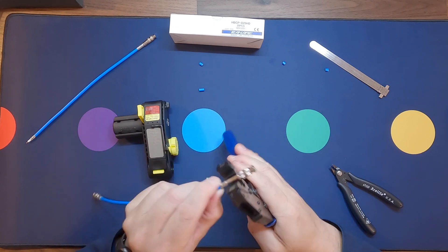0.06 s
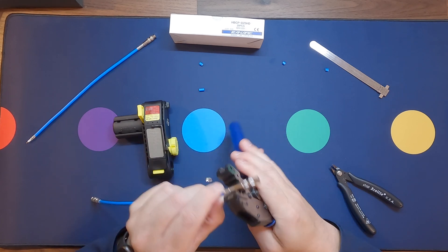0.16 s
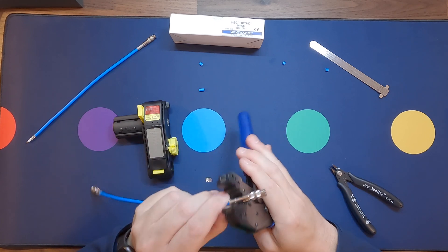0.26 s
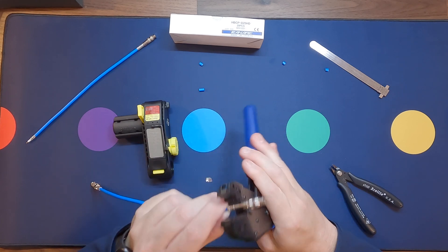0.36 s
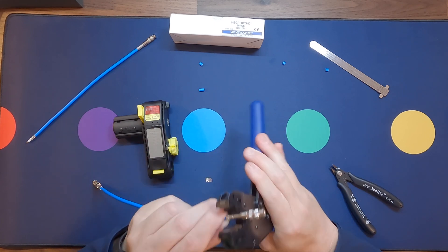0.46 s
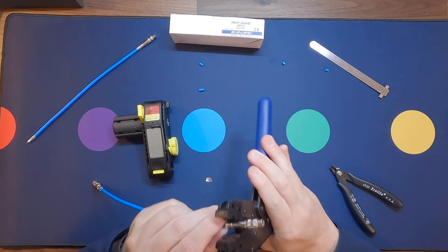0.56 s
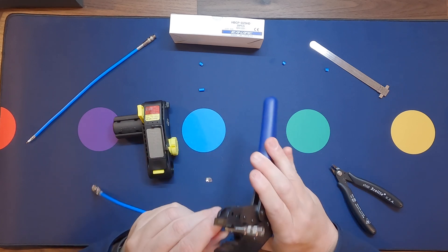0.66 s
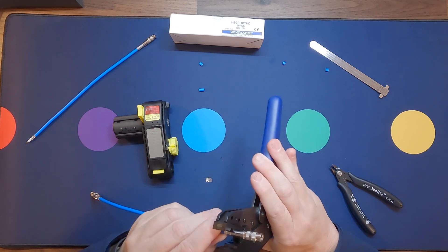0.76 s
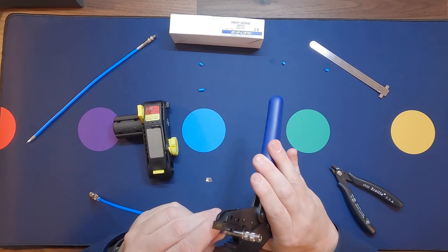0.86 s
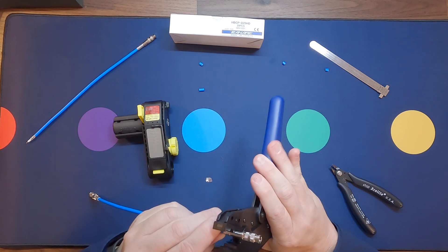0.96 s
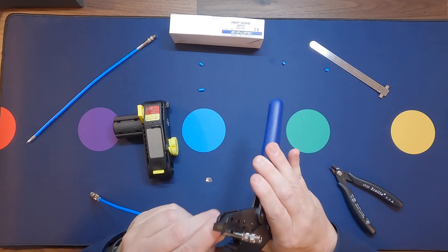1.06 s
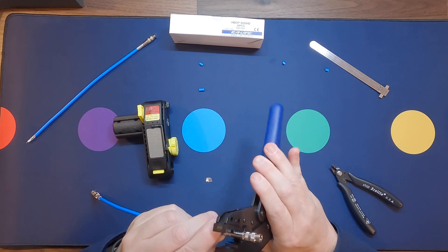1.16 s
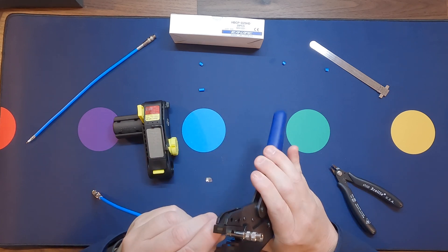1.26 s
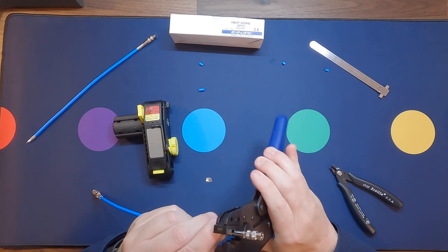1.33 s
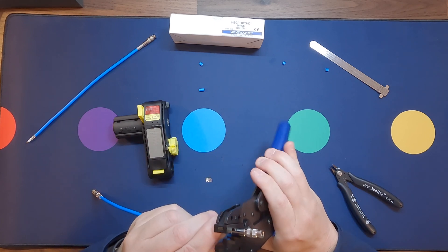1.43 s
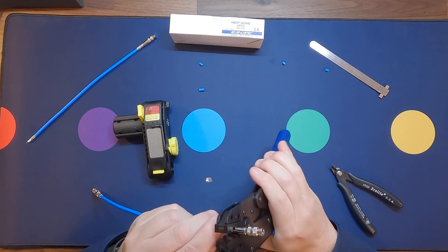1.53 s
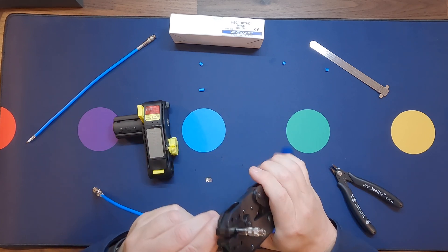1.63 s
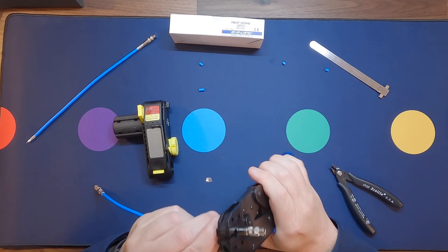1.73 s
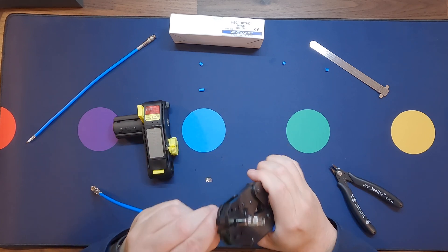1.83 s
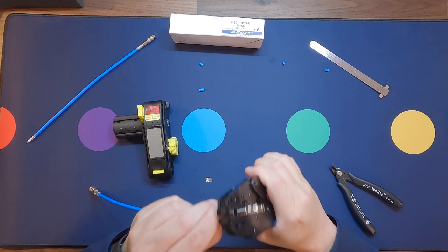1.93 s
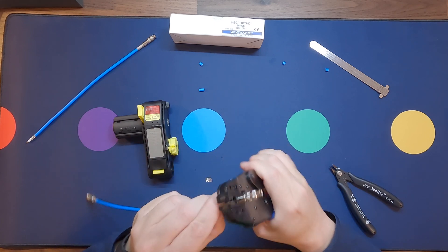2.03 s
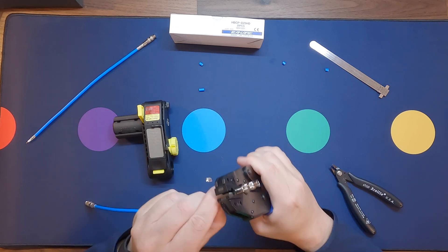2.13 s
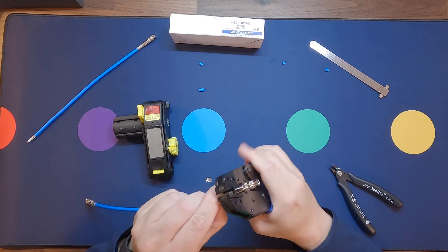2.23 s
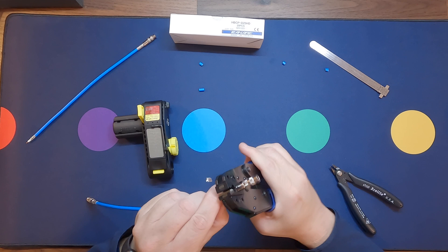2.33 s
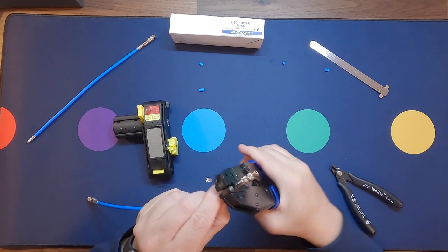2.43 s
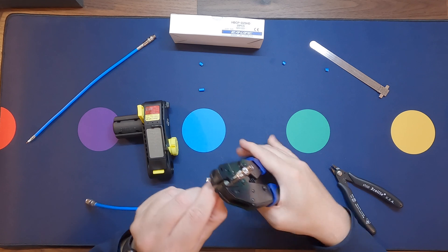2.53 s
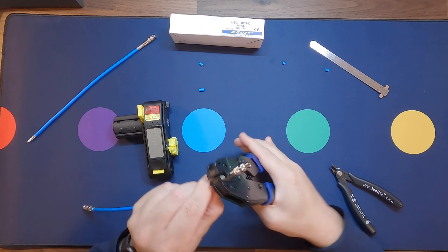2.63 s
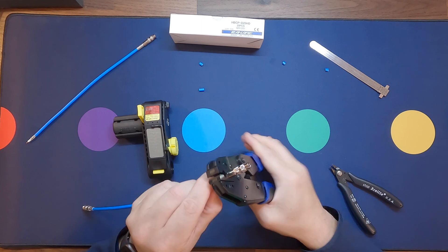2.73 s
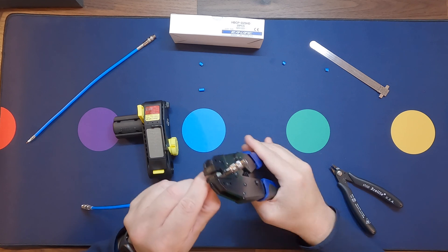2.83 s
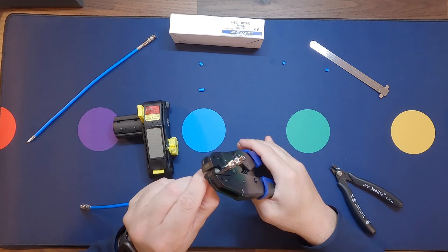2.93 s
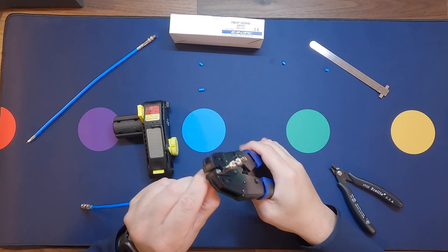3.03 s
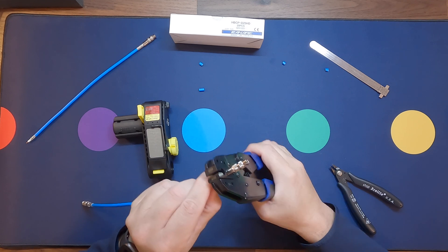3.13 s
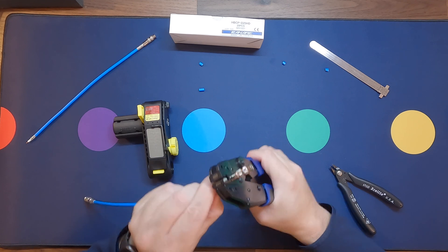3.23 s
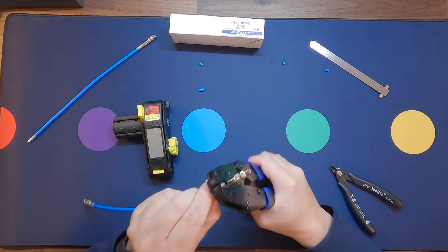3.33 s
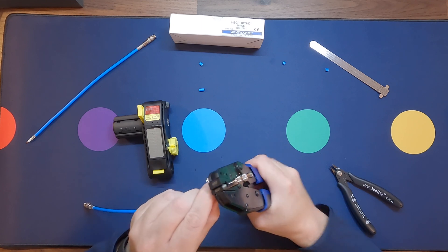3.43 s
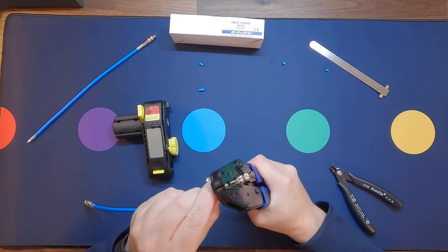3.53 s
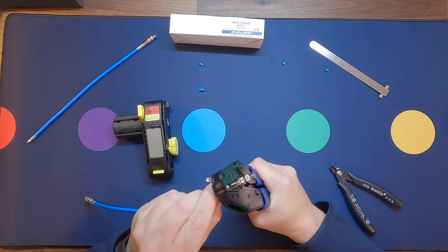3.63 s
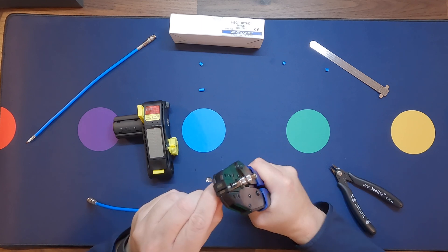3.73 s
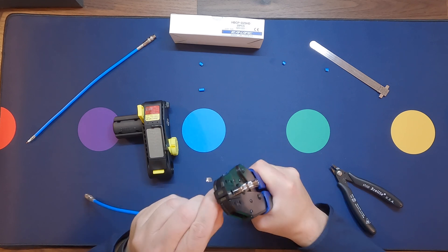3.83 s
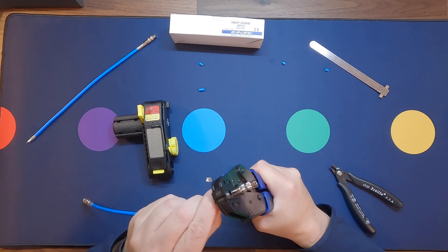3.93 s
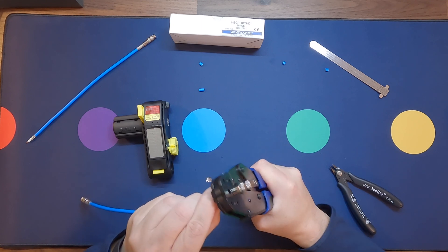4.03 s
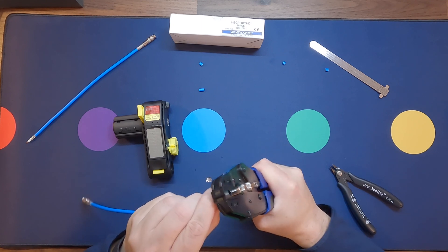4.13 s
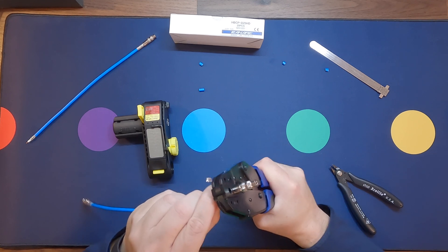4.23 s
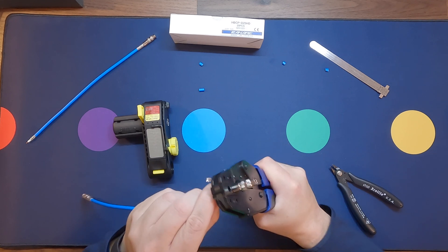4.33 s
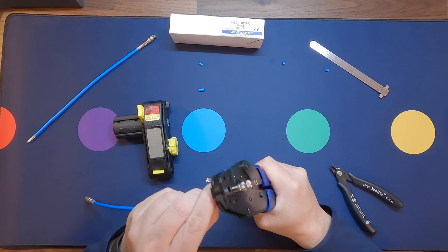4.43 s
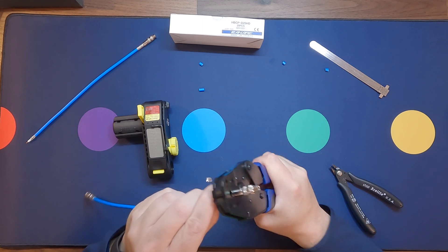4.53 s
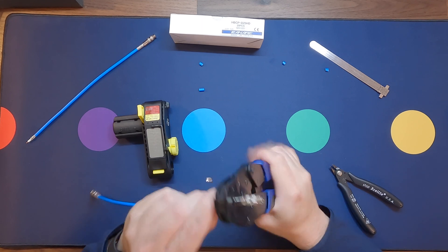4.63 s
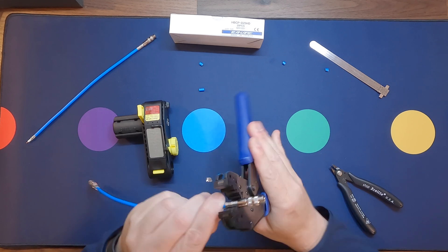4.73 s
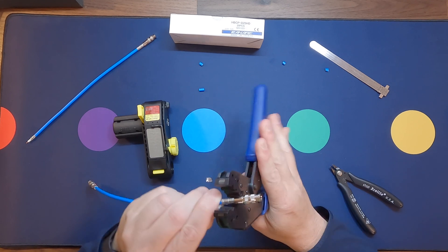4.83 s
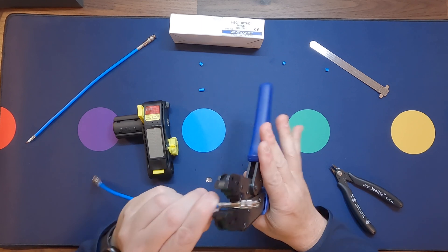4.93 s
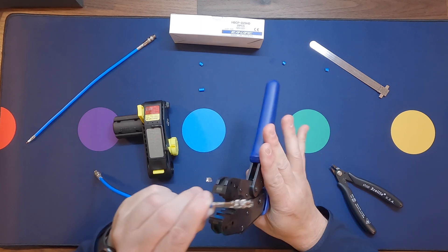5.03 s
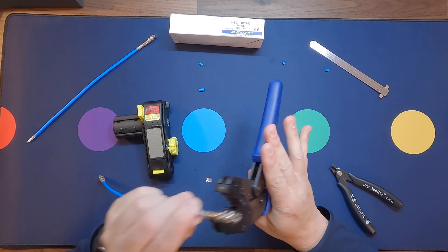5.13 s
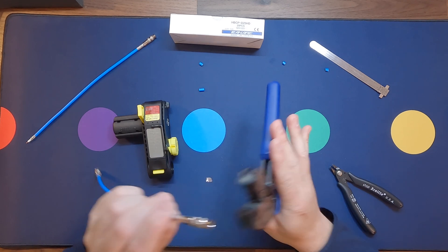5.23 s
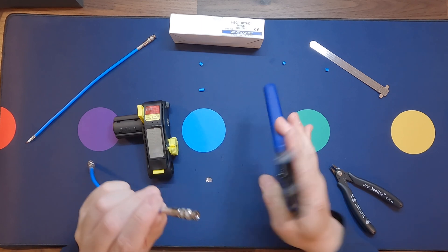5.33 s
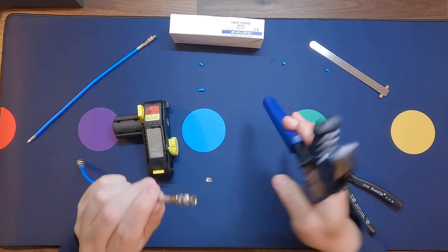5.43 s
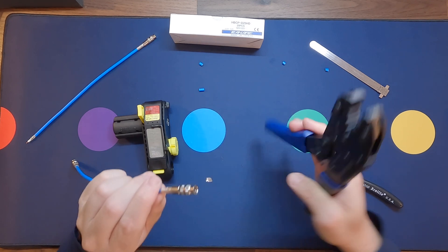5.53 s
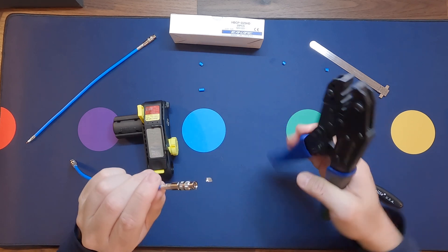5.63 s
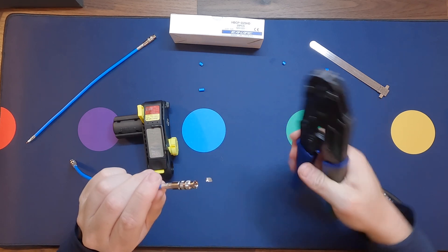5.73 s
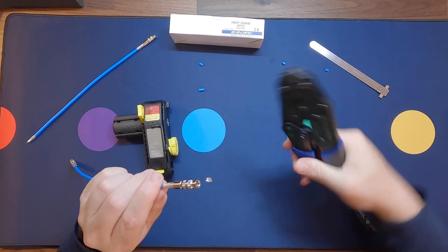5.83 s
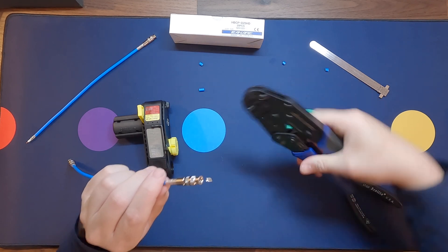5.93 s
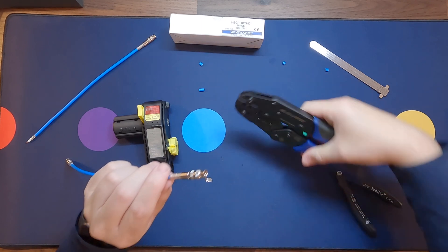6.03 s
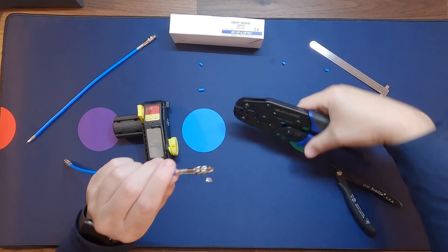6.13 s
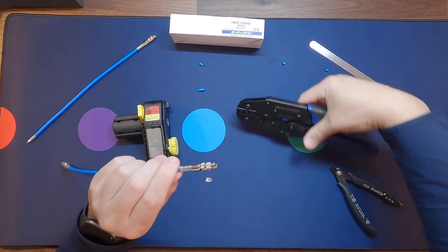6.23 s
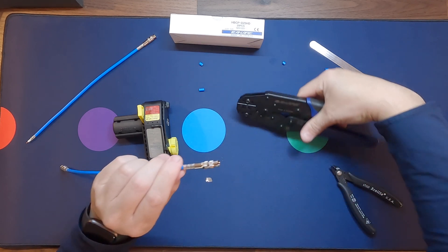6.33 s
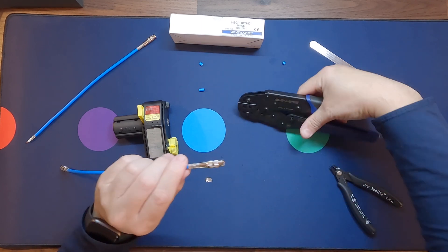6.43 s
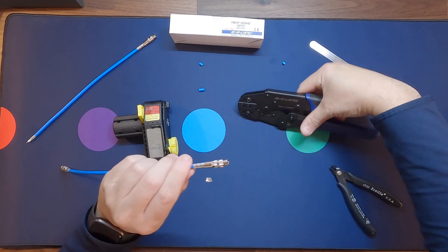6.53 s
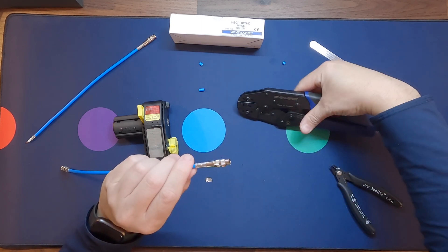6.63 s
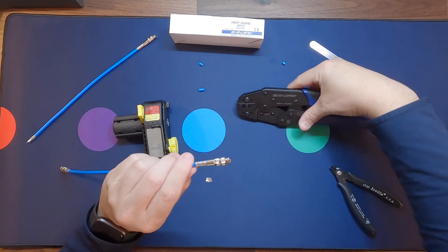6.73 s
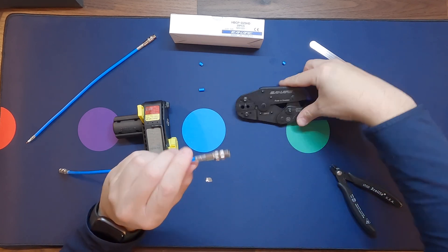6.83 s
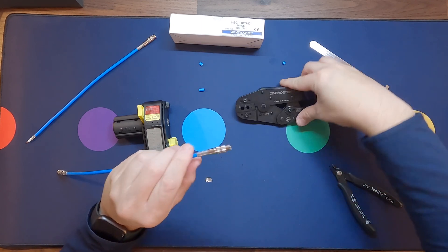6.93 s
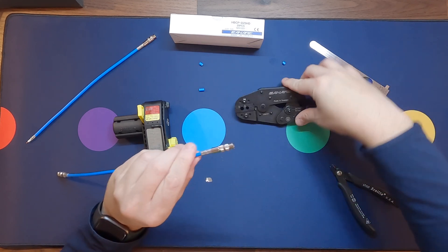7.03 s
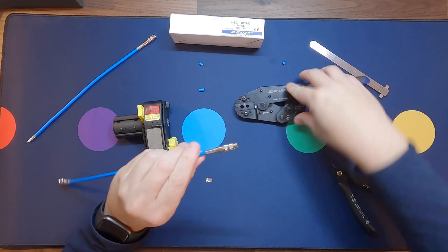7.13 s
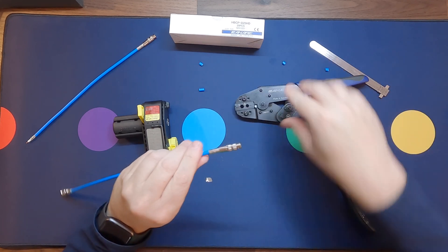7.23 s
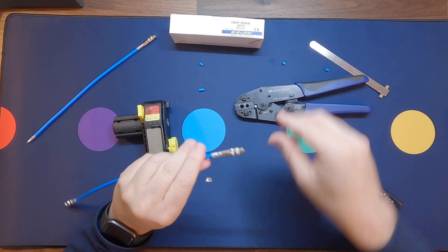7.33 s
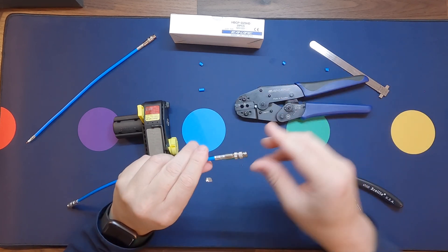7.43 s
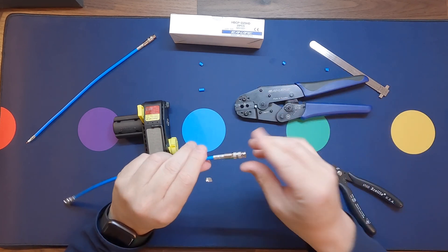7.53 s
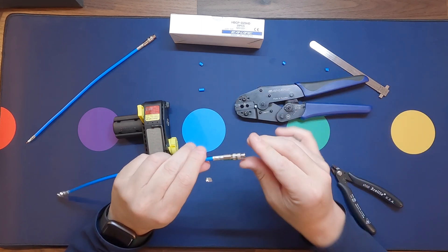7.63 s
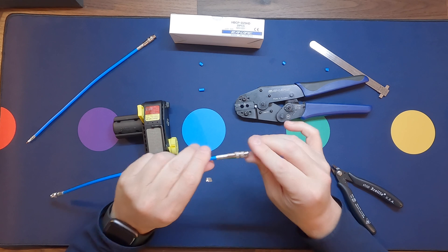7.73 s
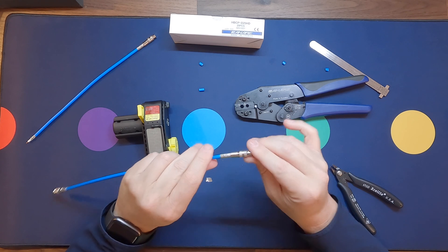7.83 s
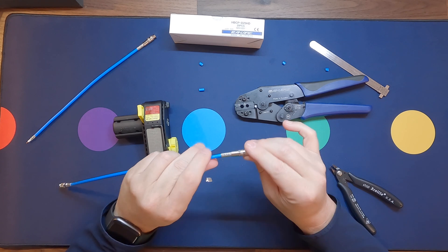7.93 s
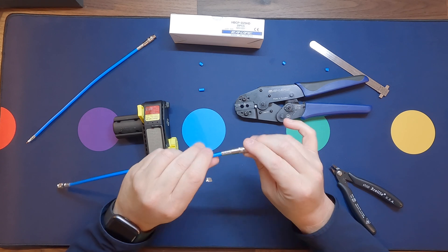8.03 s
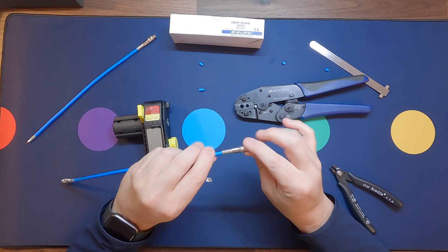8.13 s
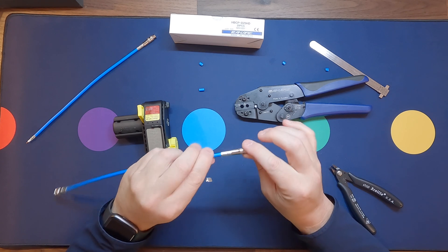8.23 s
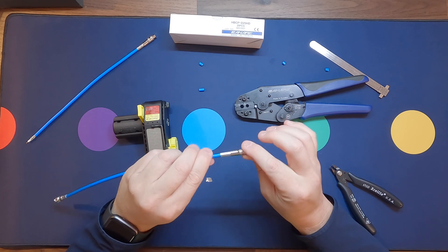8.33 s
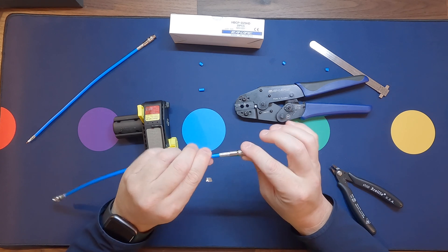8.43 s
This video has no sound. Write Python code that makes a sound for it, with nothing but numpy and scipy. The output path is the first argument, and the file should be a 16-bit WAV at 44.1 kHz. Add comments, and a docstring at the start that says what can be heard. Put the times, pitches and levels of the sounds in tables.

```python
"""A steel ratchet crimper is handled close under a camera in a small room. First come light clicks,
rubbing hands and the low sway of the camera arm; then an engine starts to drone through the wall.
Squeezes near 1.7 s and 3.3 s snap the pawl (the ratchet's catch) over its teeth. At 4.7 s it lets go
and chatters back. Near 5.7 s comes one more squeeze, while the engine changes gear.
At 7.2 s the tool is laid on a padded desk, where it thuds and bounces."""
import sys
import numpy as np
from scipy import signal
from scipy.fft import rfft, irfft
from scipy.io import wavfile
from scipy.ndimage import uniform_filter1d

SR = 44100
rng = np.random.default_rng(int(sys.argv[2]) if len(sys.argv) > 2 else 0)


def file_out(sig):
    """Save sig as 16-bit WAV at sys.argv[1]."""
    # one column per channel
    cols = np.atleast_2d(sig).T
    # limit, then scale
    lim = np.clip(cols, -1, 1)
    pcm = np.round(lim * 32767).astype(np.int16)
    wavfile.write(sys.argv[1], SR, pcm)


N = 373968


def amp(db):
    """Turn decibels into a gain."""
    return 10 ** (np.asarray(db) / 20)


def evened(x):
    """Scale a signal to an average power of one."""
    return x / np.sqrt(np.mean(x ** 2) + 1e-20)


def wobble(size, smooth_samples):
    """A smooth random curve that wanders around zero."""
    return evened(uniform_filter1d(rng.standard_normal(size), size=smooth_samples))


def curve_at(points, hz):
    """Look up a value between rows of (pitch_hz, value)."""
    pitches, values = np.transpose(points)
    return np.interp(np.log(hz + 1), np.log(pitches + 1), values)


def add(mix, start_s, sound):
    """Mix a sound in at its start time."""
    part = mix[round(start_s * SR):][:len(sound)]
    part += sound[:len(part)]


def ring(modes, size, phases):
    """A struck thing rings as dying sines; each falls 60 dB in its ring_s."""
    hz, db, ring_s = np.transpose(modes)[:, :, None]
    t = np.arange(size) / SR
    return (amp(db - 60 * t / ring_s) * np.sin(2 * np.pi * (hz * t + phases[:, None]))).sum(0)


def noise(level_db_at, likeness, size, patch_db):
    """Patchy stereo noise shaped over pitch and time; a likeness of 1 makes both sides the same."""
    hop = size // 4
    frames, hz = N // hop + 5, np.fft.rfftfreq(size, 1 / SR)
    a, b, c, d, patches = rng.standard_normal((frames, len(hz), 5)).T
    patches = evened(uniform_filter1d(uniform_filter1d(patches, size=8, axis=0), size=10, axis=1))
    same = np.clip(curve_at(likeness, hz), -1, 1)[:, None]
    left = a + 1j * b
    spectra = np.array([left, same * left + np.sqrt(1 - same ** 2) * (c + 1j * d)])
    spectra *= amp(level_db_at(hz[:, None], np.arange(frames) * hop / SR) + patch_db * patches)
    return signal.istft(spectra, nperseg=size, noverlap=size - hop)[1][:, :N]


def room_tone():
    """Distant traffic and air: a deep rumble under a thin hiss."""
    # tone of the air: pitch_hz, level_db
    colour = [(18, -24), (30, -0.5), (51, -10), (92, -25), (156, -24.5), (361, -40), (445, -43),
              (791, -53.5), (1410, -47.5), (3710, -66), (5350, -61), (9770, -73.5), (11700, -84),
              (13000, -92), (15600, -98.5)]
    # how alike left and right are: pitch_hz, likeness
    likeness = [(60, 0.85), (240, 0.93), (950, 0.23), (3770, 0.48), (15000, 0.49)]
    # how much louder the left is: pitch_hz, level_db
    balance = [(60, 0), (180, 4), (550, 5.5), (1650, 0.5), (4970, -2.5), (15000, 2.5)]
    air = evened(noise(lambda hz, t: curve_at(colour, hz), likeness, size=2048, patch_db=1.0))
    lean = amp(curve_at(balance, np.fft.rfftfreq(N, 1 / SR)) / 2)
    return amp(-45.5) * irfft(rfft(air) * [lean, 1 / lean], N)


def room_echo(faces):
    """Dense fading echoes, with one distinct slap about 10 ms in; each tool face has its own paths."""
    # what the walls give back: pitch_hz, level_db
    walls = [(1000, 2), (3000, -0.5), (7000, -2.5), (10000, 0), (15000, -5.5)]
    # how long the room rings: pitch_hz, ring_s
    ring_times = [(500, 0.39), (1320, 0.29), (3480, 0.33), (7000, 0.28), (10000, 0.2), (15000, 0.11)]
    out = 0
    for face in faces:
        echoes = np.zeros((2, SR // 2))
        arrivals = np.arange(200, SR // 2 - 20, 20) + rng.integers(0, 20, (2, (SR // 2 - 201) // 20))
        np.put_along_axis(echoes, arrivals, rng.choice([-1., 1.], arrivals.shape), 1)
        echoes[1] = 0.33 * echoes[0] + .8 * echoes[1]
        hz, t, spectra = signal.stft(echoes, SR, nperseg=256)
        fade = amp(curve_at(walls, hz)[:, None] - 60 * t / curve_at(ring_times, hz)[:, None])
        tail = signal.istft(spectra * fade, SR, nperseg=256)[1]
        tail *= amp(-15) / np.linalg.norm(tail[0])
        tail[:, round(.0098 * SR)] += amp(-23)  # the distinct slap
        out = out + signal.oaconvolve(face[None], tail, axes=1)[:, :N]
    return out


def throb():
    """A deep note softly swells and fades."""
    # the swells: start_s, length_s, pitch_hz, level_db
    swells = [(.3, 0.65, 40.38, -42.5), (1.005, 0.34, 44.4, -39), (1.325, 0.27, 42.3, -36),
              (1.852, 0.63, 43.48, -41), (2.449, 0.68, 41.6, -41.5), (2.998, 1, 45.5, -38.5)]
    out = np.zeros(N)
    for (start_s, length_s, hz, db), phase in zip(swells, rng.random(len(swells))):
        t = np.arange(0, length_s, 1 / SR)
        swell = np.sqrt(2) * amp(db) * np.sin(np.pi * t / length_s)
        add(out, start_s, swell * np.sin(2 * np.pi * (hz * t + phase)))
    return out


def engine():
    """An engine behind the wall: its firing note glides and wavers, with deeper notes under it."""
    # the firing note, one list for each stretch of driving: time_s, pitch_hz, level_db
    stretches = [
        [(1.1, 88.5, -51.5), (1.354, 135.1, -48), (1.55, 159, -52.5), (1.8, 161.4, -56.5), (1.974, 148.8, -49),
         (2.3, 126.6, -52), (2.55, 124.7, -53), (3.1, 146.2, -47.5), (3.5, 149.6, -48), (3.78, 140.8, -51.5),
         (3.9, 135, -60.5), (4.03, 128.2, -48), (4.3, 120.4, -49), (4.94, 115.2, -56), (5.7, 105.7, -54.5)],
        [(5.95, 105, -61), (6.08, 115.7, -50.5), (6.25, 129.5, -53), (6.65, 143.3, -57), (6.8, 154.8, -62),
         (6.95, 158.4, -51.5), (7.7, 162.6, -57), (8.22, 170.6, -59.5), (8.48, 162, -59.5)],
    ]
    # deeper notes in each stretch: pitch_ratio, level_db
    undertones = [
        [(1 / 2, -7.5)],
        [(1 / 3, 1.1), (2 / 3, -0.77)],
    ]
    out = np.zeros(N)
    for rows, deeper in zip(stretches, undertones):
        times, hz, db = np.transpose(rows)
        t = np.arange(times[0], times[-1], 1 / SR)
        level = np.sqrt(2) * amp(np.interp(t, times, db)) * (1 + .45 * wobble(len(t), 1200))
        cycles = np.cumsum(np.interp(t, times, hz)) / SR
        drone = sum(amp(note_db) * np.sin(2 * np.pi * (ratio * cycles + rng.random()))
                    for ratio, note_db in [(1, 0), *deeper])
        add(out, times[0], level * drone * signal.windows.tukey(len(t), .04))
    return out


def arm_sway():
    """The camera arm swings at two slow rates; each jolt of the desk sets a new swing that dies away."""
    # jolts from leaning on the desk or setting the tool down: start_s, slow_swing_db, fast_swing_db
    jolts = [(0, -33, -44.5), (.75, -42, -55), (1.25, -42.5, -43.5), (1.55, -55, -64), (1.95, -38, -42),
             (2.48, -29, -26.5), (3.68, -34, -46), (3.98, -29, -27), (4.33, -22.5, -29), (4.8, -33, -27.5),
             (5.3, -34.5, -34), (5.6, -41, -48), (6.55, -57, -34), (6.9, -42, -28), (7.2, -54.5, -21.5),
             (7.95, -49, -31.5)]
    rates_hz, fades_db_per_s, settles_s = (12.2, 23), (13, 11.5), (0.14, 0.19)
    starts, *levels = np.transpose(jolts)
    t = np.arange(N) / SR
    latest = np.clip(np.searchsorted(starts, t) - 1, 0, None)
    out = 0
    for hz, db, fade, settle_s in zip(rates_hz, levels, fades_db_per_s, settles_s):
        swing = amp(db[latest] - fade * (t - starts[latest]))
        swing = uniform_filter1d(swing, round(settle_s * SR), mode="nearest")
        out = out + np.sqrt(2) * swing * np.sin(2 * np.pi * (hz * t + rng.random()))
    return out


def desk_thuds():
    """A blow rings the board, duller the longer the contact; each bounce meets another spot."""
    # the tool lands and bounces, or a hand leans: start_s, level_db, contact_ms
    thuds = [(4.777, -36, 2.5), (6.56, -43, 7), (6.901, -30.5, 6.8), (7.1876, -4.5, 3.12),
             (7.228, -10.5, 3.33), (7.265, -17, 4.84), (7.849, -41.5, 4.1)]
    # notes of the board: pitch_hz, level_db, ring_s
    board = [(41.27, -4.5, 0.51), (69.96, -1, .3), (93, -3.5, 0.28), (133.8, -1.5, 0.12), (198.8, 1, .2),
             (248.5, -0.5, 0.13), (318, -10.5, .08), (443, -18, 0.16)]
    out = np.zeros((2, N))
    for (start_s, db, contact_ms), phases in zip(thuds, rng.random((len(thuds), 2, len(board)))):
        blow = np.hanning(round(contact_ms * SR / 1000))
        middle = np.convolve(blow, ring(board, size=15000, phases=0.42 * phases[0]))
        side = np.convolve(blow, ring(board, size=15000, phases=phases[1]))
        add(out[0], start_s, amp(db + 0.5) * (middle + 0.21 * side) / abs(middle).max())
        add(out[1], start_s, amp(db - 1.3) * (middle - 0.27 * side) / abs(middle).max())
    return out


def rubbing():
    """Skin on plastic: a hiss that swells with each movement, brighter or duller with the grip."""
    # hands and cable on grips and mat: loudest_s, fade_s, level_db, brightness_db_per_octave
    rubs = [(.69, .6, -78, 3.5), (1.3, 0.066, -73, 1.5), (1.56, 0.28, -74, 2), (2.16, 0.36, -76, -1),
            (2.47, 0.33, -61.5, 0), (2.53, 0.12, -59, 1.5), (2.76, 0.26, -60.5, -4), (2.82, .04, -59, -1),
            (2.93, 0.056, -62.5, 1), (3.24, 0.097, -63, 2.5), (4.6, 0.2, -72, -4), (4.731, 0.3, -52, -1),
            (5.02, 0.3, -70, -7), (5.43, 0.47, -72.5, 2.5), (5.711, .53, -59.5, -1.5),
            (6.23, 0.14, -68.5, -1), (6.43, 0.043, -70.5, 3.5), (6.6, 0.21, -65, -2),
            (6.759, 0.061, -57.5, 0), (6.84, 0.065, -56.5, -2.5), (6.881, .05, -53, -3.5),
            (6.97, 0.047, -61, 0.5), (7.05, 0.071, -65, 2), (7.16, 0.13, -61.5, -1), (7.24, .1, -70, -2.5),
            (7.841, .21, -80, -0.5)]
    # tone of the hiss: pitch_hz, level_db
    colour = [(530, -37), (900, -9.5), (1380, -2), (2170, -4), (3030, -8), (4820, 2), (8650, -7),
              (11900, -16.5), (13900, -24), (15500, -44)]
    # hollows of the tool that ring along: pitch_hz, width_hz, boost_db
    hollows = [(1410, 1500, 2.5), (2950, 600, 10), (5300, 900, 0), (10800, 1000, 6), (11600, 900, 6)]
    times, _, _, brightness = np.transpose(rubs)

    def hiss_db(hz, t):
        boost = sum(db / (1 + (2 * (hz - pitch) / width) ** 2) for pitch, width, db in hollows)
        tilt = np.interp(t, times, brightness) * np.log2((hz + 50) / 5000)
        return curve_at(colour, hz) + boost + tilt

    hiss = evened(noise(hiss_db, likeness=[(100, 0.86), (15000, 0.73)], size=256, patch_db=2.5))
    slips = evened(amp(1.1 * wobble(N, 250)))  # the skin sticks and lets go
    power, rise_s = np.zeros(N), .06
    for loudest_s, fade_s, db, _ in rubs:
        t = np.arange(-rise_s, fade_s, 1 / SR)
        swell = amp(db) * np.interp(t, [-rise_s, 0, fade_s], [0, 1, 0])
        add(power, loudest_s - rise_s, swell ** 2)
    return hiss * slips * np.sqrt(power)


def springs():
    """Loose parts ping and the return spring hums: thin notes that swell briefly, then die away."""
    # pings of loose parts: start_s, pitch_hz, level_db, ring_s
    pings = [(.69, 1330, -58, .22), (3.655, 2737, -55.5, .7), (4.746, 2934, -13.5, 0.058),
             (4.77, 2976, -49, 0.66), (5.03, 894, -61, 0.41), (6.2, 2820, -62, .076)]
    # the spring's two close notes: pitch_hz, level_db, ring_s
    notes = [(1056, 1.5, 1.2), (1064, -8.5, .9)]
    # the pawl sets the spring humming: start_s, level_db
    hums = [(1.68, -56), (3.26, -68), (3.365, -60.5), (3.49, -68), (3.652, -60.5), (5.73, -65.5),
            (5.86, -61.5)]
    ping_rise_s, hum_rise_s = 0.002, 0.016
    out, t = np.zeros(N), np.arange(40000) / SR
    for (start_s, *note), phase in zip(pings, rng.random((len(pings), 1))):
        add(out, start_s, (1 - np.exp(-t / ping_rise_s)) * ring([note], len(t), phase))
    for (start_s, db), phases in zip(hums, rng.random((len(hums), len(notes)))):
        add(out, start_s, amp(db) * (1 - np.exp(-t / hum_rise_s)) * ring(notes, len(t), phases))
    return out * amp(3.3 * wobble(N, 900))  # loose parts flutter


def handle_knocks():
    """The handles knock dully when they hit their stop or the mat."""
    # the knocks: start_s, level_db
    knocks = [(3.65, -42), (4.777, -24), (5.85, -50), (7.187, -35.5), (7.229, -41)]
    # notes of steel in plastic sleeves: pitch_hz, level_db, ring_s
    notes = [(244.8, -6, 0.029), (362.6, -5, .05), (470, -10, 0.091), (621, -4, 0.021), (773, -8, .04),
             (957, -0.5, 0.056), (1180, 3, 0.03), (1460, -0.5, 0.033)]
    out, t = np.zeros(N), np.arange(3000) / SR
    for (start_s, db), phases in zip(knocks, rng.random((len(knocks), len(notes)))):
        knock = (1 - np.exp(-t / 0.00099)) ** 2 * ring(notes, len(t), phases)
        add(out, start_s, amp(db) * knock / abs(knock).max())
    return out


def pawl_release(start_s, level_db, teeth):
    """List the snaps as the pawl lets go and chatters over its teeth, ever faster and duller."""
    ease = .42 ** np.arange(teeth)  # falls from 1 towards 0
    gaps_s = 0.0033 + 0.0027 * ease
    pitch_hz = 3895 + 728 * ease
    treble_db = -3 + 2.5 * ease
    starts = start_s + np.cumsum(gaps_s) - gaps_s
    return list(zip(starts, np.full(teeth, level_db), pitch_hz, treble_db))


def steel_snap(pitch_hz, treble_db):
    """The steel plates ring for a few milliseconds; the struck part rings most."""
    # notes of the plates, damped by the hand: pitch_hz, level_db, ring_s
    steel = [(1362, -18, 0.011), (2090, -0.5, 0.0062), (2440, -4, .009), (2924, -6.5, 0.012),
             (3415, -1.5, .008), (3804, -6.5, 0.011), (4378, -4.5, 0.0075), (4888, -1, 0.0085),
             (5627, -2, 0.0093), (6174, -4, 0.0078), (6465, -9, 0.017), (7407, 0.5, 0.0079),
             (7937, -5, 0.0054), (8610, -2.5, .005), (9940, -9, 0.0087), (10920, -7, 0.0076),
             (11400, -10, 0.0086), (13700, -20, 0.013), (12800, -14.5, 0.0064), (14800, -22, 0.005)]
    plates = 3  # each plays every note slightly out of tune
    hz, db, ring_s = np.repeat(np.transpose(steel), plates, axis=1)
    spread, detune, phases = rng.random((3, len(hz)))
    tilt_limit_db = treble_db * 0.59 + 2 * (treble_db < 0)
    tilt_db = np.minimum(treble_db * np.clip(np.log2(hz / 4600), -.6, 1.3), tilt_limit_db)
    notes = np.transpose([hz * (1 + .13 * (detune - .5)), db + tilt_db + 6 * (spread - .5), ring_s])
    struck = (pitch_hz, notes[:, 1].max() + 3, 0.011 * (4000 / pitch_hz) ** .25)
    t = np.arange(700) / SR
    rise = (1 - np.exp(-t / 0.0011)) ** 2  # the contact slides on before it seats
    return rise * ring(np.vstack([notes, struck]), len(t), np.append(phases, 0))


def crimper():
    """Three faces of the tool send out every snap, each with its own blend of notes."""
    # snaps of pawl, jaws and handles: start_s, level_db, pitch_hz, treble_db
    snaps = [(0.2777, -30.5, 5670, -12), (0.3751, -31.0, 2524, -10), (0.6665, -48, 1360, -1),
             (0.6866, -35.5, 1304, -6), (1.0521, -46, 2370, -14), (1.546, -51.5, 6210, -7),
             (1.553, -46.5, 3296, -3), (1.654, -46, 5030, -2), (1.6646, -14, 7270, 1.5),
             (1.6773, -16.5, 6360, 3.5), (1.691, -13, 7120, -1), (1.7118, -13.5, 7350, 4.5),
             (1.8378, -37.5, 2188, -2.5), (1.9522, -52.0, 5530, -2), (2.4548, -48.5, 5960, 7),
             (2.4933, -35.5, 5060, 2.5), (2.738, -51.5, 3402, -14), (3.2552, -23, 5830, 3.5),
             (3.3629, -22, 5220, 0.5), (3.459, -45.5, 1190, -11), (3.484, -19, 3400, 4),
             (3.5406, -40, 1300, -14.5), (3.5514, -17.5, 3390, 2.5), (3.6497, -12.5, 2610, -0.5),
             (4.543, -51, 2135, -10.5), (4.679, -51.5, 5150, -2), (4.708, -41, 2095, -2),
             (4.7763, -14, 2070.0, -10), (4.7859, -38.5, 5676, 5), (4.9482, -39, 4150, -8),
             (5.6648, -48, 3346, -5), (5.72, -12.5, 7670, 4), (5.73, -12, 6820, 6),
             (5.7428, -14.5, 6950, 5.0), (5.7707, -13.5, 5970, 4.5), (5.798, -14.0, 6640, 7.5),
             (5.8206, -15, 7800, 2.5), (5.8494, -12, 4480, 2), (5.8607, -14.5, 5340, 0.5),
             (5.9889, -33.5, 7200, -4), (5.9997, -39, 4140, -12.5), (7.091, -51, 10500, 13),
             (7.1024, -49, 10740, 21), (7.113, -56.5, 12000, 11.5), (7.183, -32.5, 2650, -8),
             (7.2295, -43, 1460, -42), (7.2763, -50.5, 1880, -5)]
    chatter = pawl_release(start_s=4.7268, level_db=-14, teeth=8)
    faces = np.zeros((3, N))
    for start_s, level_db, pitch_hz, treble_db in snaps + chatter:
        for face in faces:
            snap = steel_snap(pitch_hz, treble_db)
            add(face, start_s - .0004, amp(level_db + 4.0) * snap / abs(snap).max())
    return faces


def scene():
    """Mix the tool, the desk and the room into left and right."""
    drone = (throb() + engine()) * amp([[.3], [-.3]])
    faces = crimper() + handle_knocks()
    # both sides hear the face turned to the camera, and differ by a little of the next face
    direct = faces[0] * amp([[-.5], [.5]]) + faces[1] * amp(-11) * np.array([[1], [-1]]) + springs()
    sway = arm_sway() * amp([[2.5], [-3]])  # the arm shakes the left side more
    return direct + drone + sway + desk_thuds() + room_echo(faces) + rubbing() + room_tone()


def record(dry):
    """The camera rounds off the loudest peaks and cuts the highest treble."""
    ceiling, cutoff_hz = 0.68, 15800
    rounded = ceiling * np.tanh(dry / ceiling)
    treble_cut = signal.firwin(511, cutoff_hz, window=("kaiser", 9), fs=SR)
    return signal.oaconvolve(rounded, treble_cut[None], "same")


dry = scene()
out = record(dry)
file_out(out)
```